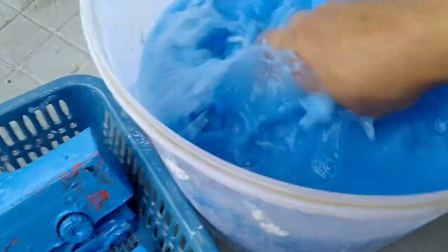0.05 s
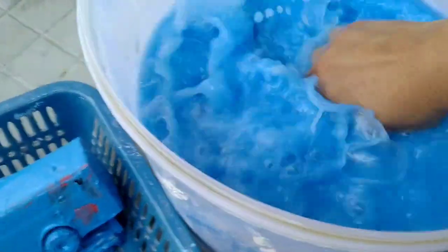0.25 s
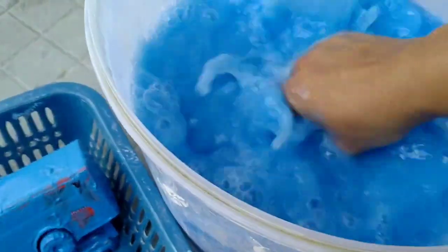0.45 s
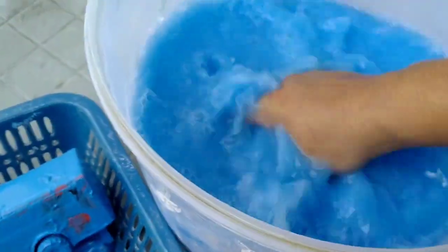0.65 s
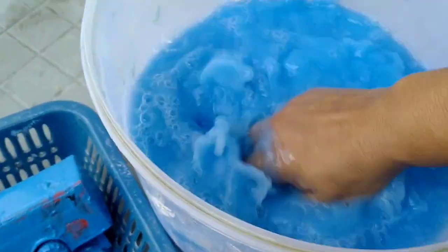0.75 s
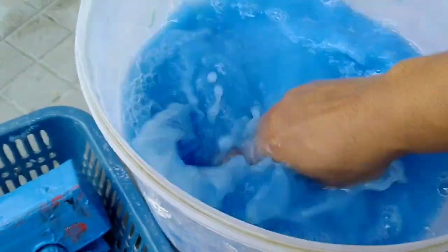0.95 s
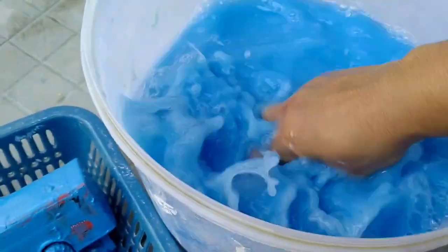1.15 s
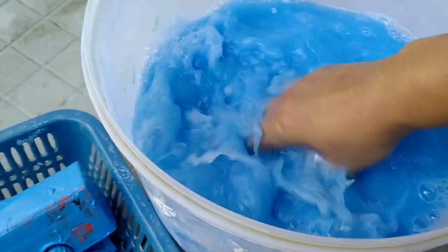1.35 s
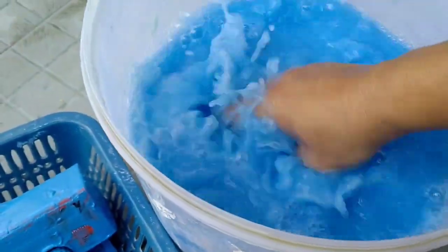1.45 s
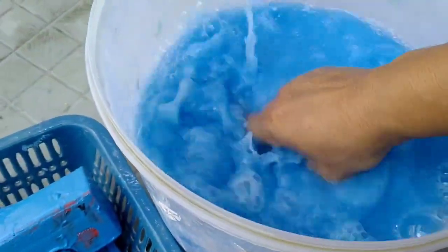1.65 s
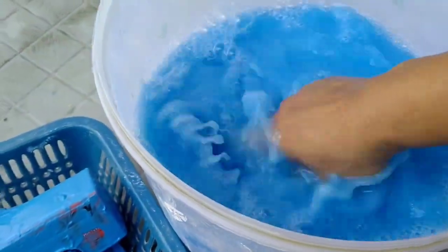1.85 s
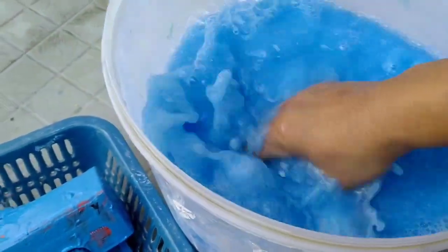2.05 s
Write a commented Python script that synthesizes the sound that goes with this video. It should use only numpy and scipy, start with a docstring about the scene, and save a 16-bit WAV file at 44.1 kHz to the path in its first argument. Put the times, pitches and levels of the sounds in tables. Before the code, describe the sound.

Water splashing and bubbling in a bucket, stirred by hand in two bursts, close by.

```python
"""A hand swishes a toy through soapy water in a plastic bucket, close by in a small room with a low rumble.
The first strokes fold air into the water: big bubbles gulp and plip over a swarm of small ones,
sheets of water slap down, and spray ticks on the surface. Near the one-second mark the water calms.
Then a sharp stroke starts more sloshing, which dies down before one last small stir at two seconds.
All along, the sound echoes in the bucket and the room, and the loudest gulps overload the recorder."""
import sys
import numpy as np
from scipy import signal
from scipy.io import wavfile
from scipy.ndimage import map_coordinates

SR = 44100
rng = np.random.default_rng(int(sys.argv[2]) if len(sys.argv) > 2 else 0)


def waveform_to_disk(signal):
    """Save audio, clipped to [-1, 1], as 16-bit WAV at the path in sys.argv[1]."""
    frames = np.transpose(np.atleast_2d(signal))
    scaled = np.clip(frames, -1, 1) * 32767
    samples = np.round(scaled).astype(np.int16)
    wavfile.write(sys.argv[1], SR, samples)


N = 92610

GLIDE = 0.074  # a bubble's pitch rises by this fraction over its ring time
SLAP_FADE_S, TICK_FADE_S = 0.0028, 0.0022


def bubble(hz, ring_s, glide, swell_cycles=1.49):
    """A trapped pocket of air swells, rings and rises in pitch as it nears the surface."""
    t = np.arange(0, 3 * ring_s, 1 / SR)
    loudness = (1 - np.exp(-(t * hz / swell_cycles) ** 2)) * np.exp(-(t / ring_s) ** 2)
    return loudness * np.sin(2 * np.pi * hz * (t + .5 * glide * t ** 2 / ring_s))


def gulps(gain_db=-1.5, wobble_depth=0.15, wobble_hz=252, waver_s=4e-5):
    """Big bubbles ring one by one; their shape wobbles, which roughens the ring and bends its pitch."""
    # big single bubbles: start_s, pitch_hz, level_db (before gain_db), ring_ms
    big_bubbles = [(0.0747, 5600, -15, 2.3), (0.1332, 2200, 11.5, 0.91), (0.1524, 2440, 6.5, 1.34),
                   (0.2272, 775, -5, 15.6), (0.2802, 1836, 3.5, 3.1), (0.2897, 790, -1.5, 6.2),
                   (0.3003, 1640, -1, 6.6), (0.3087, 824, -5, 10), (0.3265, 1410, 2, 3.2),
                   (0.3322, 1616, 5, 7.4), (0.3402, 520, -6.5, 12.6), (0.3415, 1910, 5, 3.5),
                   (0.3438, 1380, 2.5, 4), (0.3962, 2660, -1, 2.5), (0.403, 1540, -4.5, 4.5),
                   (0.4435, 2270, -13, 8.6), (0.4608, 860, -10.5, 5.9), (0.4762, 1740, -12.5, 7.3),
                   (0.4875, 2700, -11.5, 3.3), (0.5982, 327, -20, 12), (0.6376, 1750, -5.5, 4.6),
                   (0.6936, 514, -4, 2.3), (0.726, 2860, -12.5, 5.2), (0.7811, 1413, -13.5, 7.5),
                   (0.8594, 1300, -7.5, 2.6), (0.8886, 2550, -10.5, 6.4), (0.8886, 1710, -7, 3.9),
                   (0.9727, 1800, -20, 7.8), (0.986, 3460, -15.5, 1.7), (1.0247, 2520, -10.5, 6.4),
                   (1.047, 2960, -7, 2.7), (1.0748, 966, -5.5, 3.6), (1.0752, 1690, 1, 1.5),
                   (1.137, 958, -3, 10), (1.148, 1445, 3, 3.9), (1.1575, 2080, 1.5, 2.7),
                   (1.1648, 1493, -3, 5), (1.1735, 2000, -4, 1.8), (1.1845, 1900, 11, 1.5),
                   (1.2318, 1560, -1, 4.9), (1.2362, 1630, 4, 5.2), (1.2445, 2000, -9.5, 4.8),
                   (1.3339, 1647, -10, 8.4), (1.400, 1310, -11, 5.8), (1.4375, 1670, -6.5, 6.9),
                   (1.4767, 568, -12, 9.9), (1.5292, 1700, -6, 7.2), (1.5294, 2170, 1, 2.1),
                   (1.575, 1720, -2.5, 8.4), (1.5825, 2000, -1, 3.9), (1.662, 411.5, -16.5, 23),
                   (1.6635, 590, -3, 5.8), (1.691, 1900, -2.5, 3.2), (1.696, 1855, -0.5, 4.1),
                   (1.708, 1900, -2.5, 2.8), (1.721, 2520, 2, 1.03), (1.7303, 2370, -10, 5.4),
                   (1.8264, 1495, -13, 4.9), (1.9392, 2590, -12.5, 4.7), (1.9438, 4100, -13.5, 4.7),
                   (1.962, 3370, -16.5, 3.5), (2.0338, 1710, -10, 5.7), (2.0518, 642, -17, 13),
                   (2.0934, 1330, -12.5, 4.3)]
    rings = np.zeros(N)
    for start_s, hz, level_db, ring_ms in big_bubbles:
        add(rings, start_s, amp(level_db + gain_db) * bubble(hz, ring_ms * 1e-3, GLIDE))
    low_pass = signal.butter(2, wobble_hz, fs=SR, output="sos")
    wobble = unit(signal.sosfilt(low_pass, rng.standard_normal(N)))
    bent = map_coordinates(rings, [np.arange(N) + waver_s * SR * wobble])
    return bent * (1 + wobble_depth * wobble)


def churn():
    """Deep gurgle, small bubbles and spray rise and fall with the strokes of the hand."""
    # how hard the water is stirred, in relative levels: time_s, gurgle_db, babble_db, spray_db
    strokes = [(0, -38, -17, -23.5), (0.046, -36, -37, -35), (0.1, -36.5, -27.5, -35),
               (0.143, -33.5, -22, -10), (0.175, -28.5, -22, -18.5), (0.215, -43, -19, -25.5),
               (0.26, -24, -12, -21), (0.29, -26.5, -12.5, -18.5), (0.358, -16.5, -14, -15),
               (0.411, -24.5, -19, -18), (0.44, -26.5, -36, -33), (0.529, -22.5, -21, -30),
               (0.574, -37, -29, -33), (0.629, -30.5, -26, -32.5), (0.723, -27.5, -26.5, -29.5),
               (0.813, -55, -34.5, -37.5), (0.868, -33, -22.5, -34.5), (0.94, -64, -33, -31.5),
               (1.01, -59, -32.5, -31.5), (1.052, -57, -18, -24.5), (1.133, -39, -23, -32),
               (1.157, -19.5, -7, -16), (1.205, -33.5, -23.5, -30.5), (1.27, -31.5, -26, -25.5),
               (1.33, -26.5, -19.5, -27), (1.381, -28.5, -24, -31.5), (1.43, -22, -17.5, -24),
               (1.5, -25.5, -20, -26.5), (1.552, -29.5, -26.5, -29.5), (1.585, -19, -15.5, -23),
               (1.63, -36.5, -18.5, -27), (1.67, -18.5, -16, -21.5), (1.71, -26, -22, -24.5),
               (1.769, -24.5, -21.5, -29.5), (1.869, -51, -30, -35), (2.013, -60, -33, -29),
               (2.039, -26, -19.5, -34), (2.076, -48, -35.5, -29), (2.1, -45, -16.5, -22)]
    # tone of the deep bubbles: pitch_hz, level_db
    gurgle_tone = [(150,-30),(280,-10.5),(420,0.5),(600,2),(1050,7),(1400,-32.5)]
    # tone of the small bubbles: pitch_hz, level_db
    babble_tone = [(550,-22.5),(930,-3.5),(1170,-7),(1450,-0.5),(1850,1.5),(2300,-2),(3000,-4.5),(4000,-8),(6500,-23)]
    # tone of the spray: pitch_hz, level_db
    spray_tone = [(2000,-15),(4000,-9.5),(5200,-7),(6800,-4),(8000,1),(10000,-6),(12000,-3),(14000,1),(15300,7.5)]
    time_s, *levels = np.transpose(strokes)
    gurgle_gain, babble_gain, spray_gain = (amp(np.interp(np.arange(N) / SR, time_s, db)) for db in levels)
    deep = swarm(204.2, 1024, cycles=3.13, spread_db=4.0, glide=0.14, count=800)
    small = swarm(700, 6500, cycles=4.6, spread_db=12, glide=.07, count=5000)
    fizz = unit(swarm(2500, 12000, cycles=7, spread_db=22, glide=.04, count=1500))
    drops = unit(droplets(length_s=0.00076, spread_db=17, count=1000))
    gurgle = gurgle_gain * unit(colour(deep, gurgle_tone))
    babble = babble_gain * unit(colour(small, babble_tone))
    spray = spray_gain * unit(colour(amp(-4.5) * fizz + drops, spray_tone))
    return amp(-1.5) * gurgle + amp(-3) * babble + amp(1.5) * spray


def swarm(low_hz, high_hz, cycles, spread_db, glide, count):
    """A steady stream of bubbles, each with a random pitch, loudness and ring time."""
    stream = np.zeros(N)
    for k, (when, pitch, size, ring, rise) in enumerate(rng.random((count, 5))):
        hz = low_hz * (high_hz / low_hz) ** pitch
        ring_s = cycles * 2 ** (2 * ring - 1) / hz
        gain = amp(spread_db * size ** 2) * np.sqrt(hz / high_hz)
        start_s = (k + when) / count * N / SR
        add(stream, start_s, gain * bubble(hz, ring_s, (2 * rise - .5) * glide))
    return stream


def splashes(slap_db=-3, plink_db=-11, tick_db=-3.5):
    """Sheets of water slap down and trap tiny bubbles; flying drops tick on the surface."""
    # water slapping on water: start_s, level_db (before slap_db or plink_db)
    slap_hits = [(0.1294, -11), (0.1461, -1), (0.2684, -5), (0.280, 6.5), (0.2927, -7), (0.332, -3),
                 (0.3555, -1), (0.3734, -14), (0.4239, -0.5), (0.4883, -3.5), (0.5399, -11),
                 (0.6307, -10.5), (0.6594, -12.5), (0.887, -10), (0.973, -25), (1.0556, -14.5), (1.074, -7),
                 (1.1378, -3), (1.1585, 2), (1.163, -16), (1.175, -7), (1.3995, -9), (1.5585, -11.5),
                 (1.5805, -3), (1.6896, 3), (1.7075, -12), (1.7624, -8), (1.8293, -10.5), (1.9478, -12),
                 (1.9608, -17.5)]
    # sharp ticks of spray: start_s, level_db (before tick_db)
    tick_hits = [(0.1453, 3.5), (0.247, 9.5), (0.2837, 9), (0.356, 4.5), (0.424, 9), (0.4903, 6.5),
                 (0.6333, 1), (0.7375, -3), (0.8777, 5.5), (1.1634, 1.5), (1.199, -4), (1.417, 1),
                 (1.499, -1.5), (1.651, 1), (1.6906, 4), (1.7646, 1)]
    # tone of a slap: pitch_hz, level_db
    slap_tone = [(250,-19.5),(800,0),(1900,9),(4800,-7),(8000,-6.5),(15500,-22)]
    # tone of a tick: pitch_hz, level_db
    tick_tone = [(6000,-32),(8000,1.5),(10000,-6.5),(12500,-4),(15000,5.5)]
    slaps, ticks, trapped = np.zeros((3, N))
    for start_s, level_db in slap_hits:
        add(slaps, start_s, amp(level_db + slap_db) * burst(SLAP_FADE_S))
        add(trapped, start_s, amp(level_db + plink_db) * plinks())
    for start_s, level_db in tick_hits:
        add(ticks, start_s, amp(level_db + tick_db) * burst(TICK_FADE_S))
    return colour(slaps, slap_tone) + colour(ticks, tick_tone) + trapped


def burst(fade_s, rise_s=0.00089):
    """Water lands in a short spatter that starts sharply and dies away."""
    t = np.arange(2048) / SR
    return crackle(len(t), spread_db=0.5) * (1 - np.exp(-t / rise_s)) * np.exp(-t / fade_s)


def plinks(middle_hz=3790, ring_s=0.0027, count=3):
    """A few tiny bubbles trapped by a slap ring within an octave of the middle pitch."""
    rings = np.zeros(SR // 20)
    for pitch, when in rng.random((count, 2)):
        add(rings, when * SLAP_FADE_S * 2, bubble(middle_hz * 2 ** (2 * pitch - 1), ring_s, GLIDE))
    return rings


def droplets(length_s, spread_db, count):
    """Many small drops land, each a brief clump of crackle."""
    when, size = rng.random((count, 2)).T
    landings = ((np.arange(count) + when) / count * (N - 1)).astype(int)
    power = np.zeros(N)
    power[landings] = amp(spread_db * size ** 5) ** 2
    decay = np.exp(-1 / (length_s * SR))
    clumps = signal.lfilter([1], np.poly([decay, decay]), power)  # each landing swells and fades
    return np.sqrt(abs(clumps)) * crackle(N, spread_db=5)


def crackle(n, spread_db):
    """Tiny, tightly packed impacts of uneven size."""
    return unit(rng.standard_normal(n) * amp(spread_db * np.minimum(rng.exponential(1, n), 4)))


def bucket(sound, first_s=0.001166, last_s=.014, fade_s=0.014, count=14):
    """Sound bounces between the walls of the bucket in quick echoes."""
    delay_s = first_s + (last_s - first_s) * (np.arange(count) + rng.random(count)) / count
    echoes = np.zeros(SR // 10)
    echoes[(delay_s * SR).astype(int)] = rng.choice([-1, 1], count) * np.exp(-delay_s / fade_s)
    return apply_filter(sound, echoes)


def room(sound, gap_s=.006, size=256):
    """The room's echoes blur into a short tail that lasts longest in the bass."""
    # how long the room rings: pitch_hz, fade_s (time to fall by 60 dB)
    fade_times = [(200,1),(2500,0.26),(16000,0.47)]
    hz, t, noise = signal.stft(rng.standard_normal(SR // 2), SR, nperseg=size)
    fade = amp(-60 * t / look_up(fade_times, hz)[:, None])
    _, tail = signal.istft(noise * fade * (t > gap_s), SR, nperseg=size)
    return apply_filter(sound, tail)


def rumble():
    """A steady, low noise lies in the background."""
    # tone of the rumble: pitch_hz, level_db
    rumble_tone = [(15,1),(35,-8),(55,0.5),(85,-5.5),(115,-4),(170,-19),(400,-16),(1000,-29),(4000,-32.5),(16000,-36.5)]
    return unit(colour(rng.standard_normal(N), rumble_tone, size=8192))


def amp(db):
    """Turns decibels into a number to multiply by."""
    return 10 ** (np.asarray(db) / 20)


def unit(sound):
    """Scales a sound to an average (rms) level of 1."""
    return sound / np.sqrt(np.mean(sound ** 2) + 1e-20)


def look_up(table, hz):
    """Reads between the rows of a table, giving each octave equal room."""
    pitches, values = np.transpose(table)
    return np.interp(np.log(hz + 1), np.log(pitches + 1), values)


def add(mix, start_s, sound):
    """Mixes a sound in at its start time."""
    part = mix[max(round(start_s * SR), 0):][:len(sound)]
    part += sound[:len(part)]


def apply_filter(sound, response):
    """Gives every sample the same ring or echo, scaled to an energy of 1."""
    return signal.oaconvolve(sound, response / np.linalg.norm(response))[:N]


def colour(sound, tone, size=2048):
    """Makes some pitches stronger and others weaker, following a tone table."""
    log_gain = np.log(amp(look_up(tone, abs(np.fft.fftfreq(size, 1 / SR)))))
    spectrum = np.exp(signal.hilbert(log_gain).conj())  # rings after a hit, never before it
    return apply_filter(sound, np.fft.ifft(spectrum).real[:size // 2])


def scene():
    """The water in its bucket and room, over a low rumble."""
    water = churn() + gulps() + splashes()
    water = water + amp(-11) * bucket(water)
    background = amp(-38.5) * rumble()
    return (water + amp(-16.5) * room(water) + background)[None]


def record(dry, top_hz=15650):
    """The recorder flattens peaks as they near full level, then cuts off the highest treble."""
    clipped = dry / (1 + dry ** 8) ** (1 / 8)
    low_pass = signal.firwin(401, top_hz, window=("kaiser", 7), fs=SR)
    return signal.oaconvolve(clipped, low_pass[None], "same")


dry = scene()
out = record(dry)
waveform_to_disk(out)
```